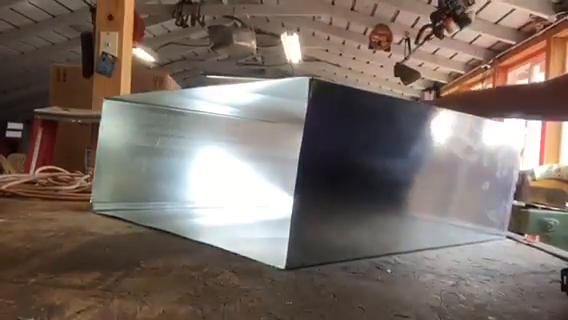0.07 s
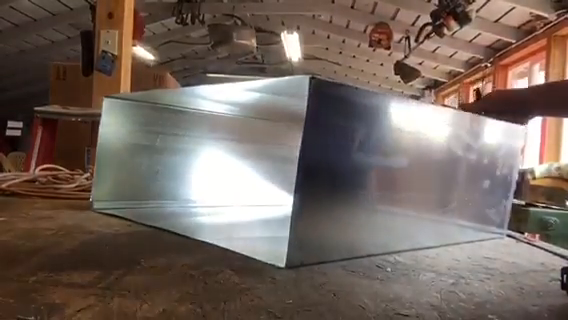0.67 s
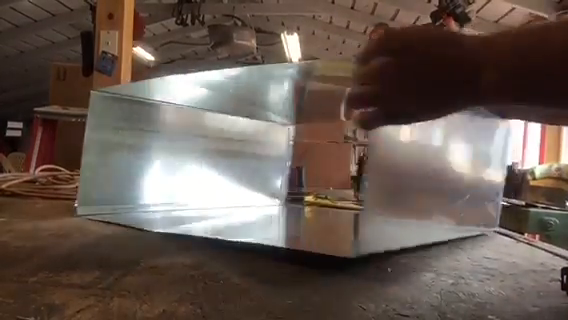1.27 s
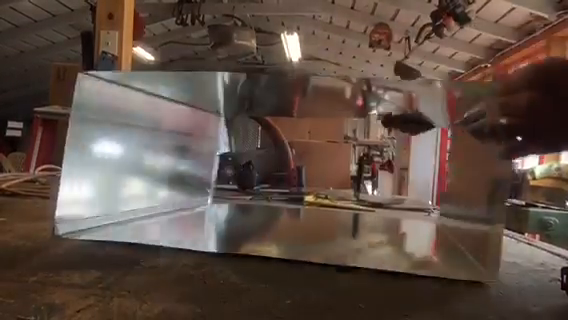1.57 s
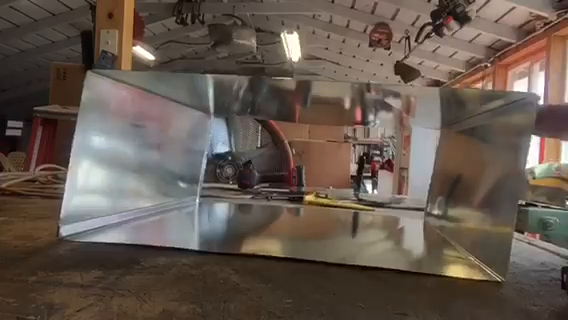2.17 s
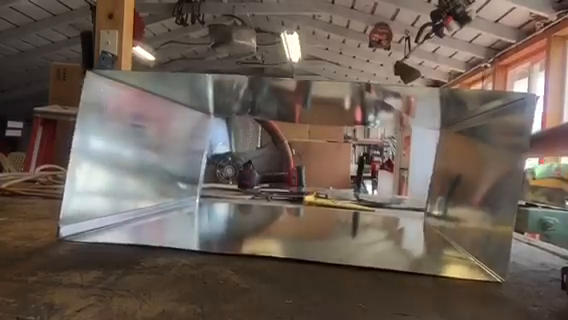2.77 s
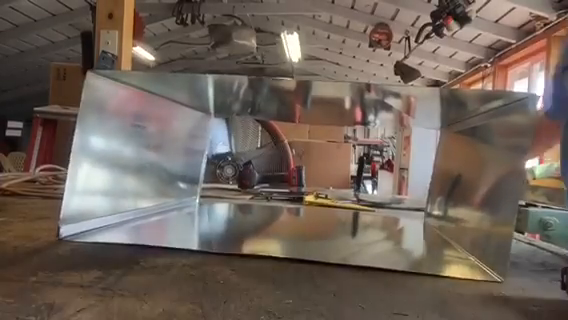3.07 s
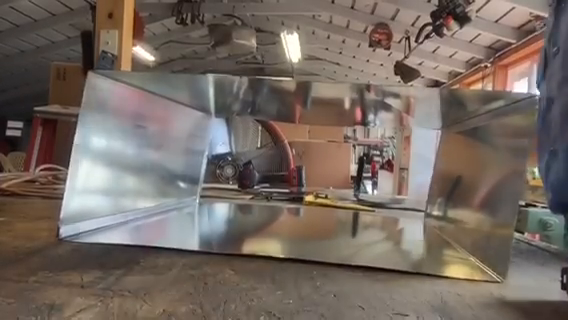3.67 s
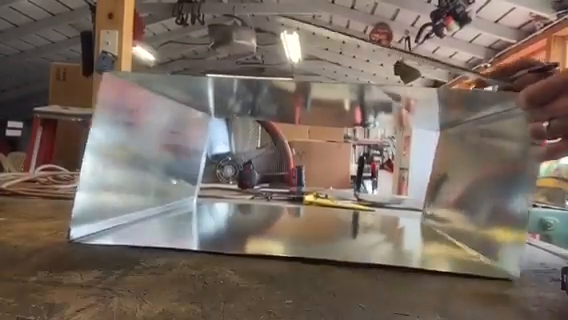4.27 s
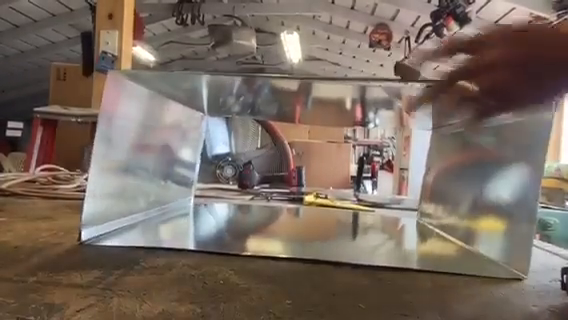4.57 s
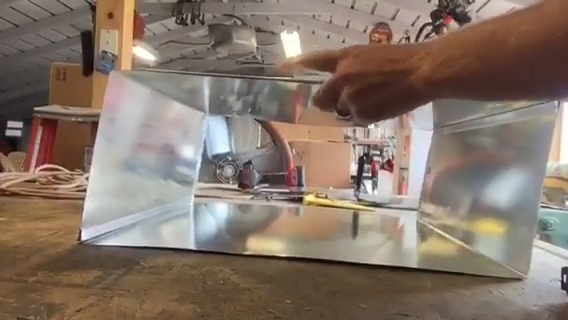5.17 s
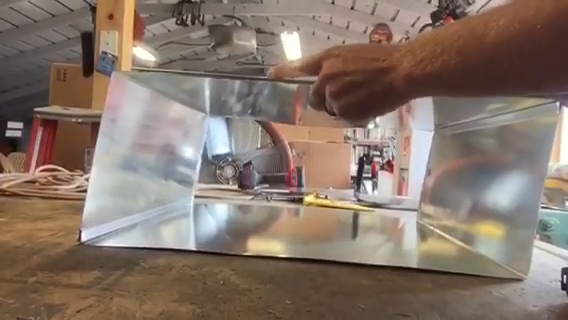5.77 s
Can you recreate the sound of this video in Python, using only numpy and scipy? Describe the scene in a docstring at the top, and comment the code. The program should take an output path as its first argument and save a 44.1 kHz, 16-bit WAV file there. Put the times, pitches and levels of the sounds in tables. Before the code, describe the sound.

A few dull knocks lead into a rough, snagging scrape as a hollow metal duct is turned on a concrete floor, ending in a boom. Quiet footsteps shuffle on grit. The duct slides again briefly, the stressed sheet pops sharply, and it falls flat with a loud clatter and a last light tap. Everything is heard up close, with a short workshop echo and a faint low rumble.

```python
"""A sheet-metal duct is handled on a gritty workshop floor, close to the microphone.
First come dull knocks and the soft hiss of skin on the sheet. From 1.1 s the duct is swung round:
its edge scrapes, judders and snags on the grit, and the thin walls boom. From 2.2 s shoes scuff
as the worker steps round it. At 4 s it is nudged again, at 4.6 s a stressed wall snaps through
sharply, and near 5 s the duct drops flat with a clatter."""
import sys
import numpy as np
from scipy import signal
from scipy.fft import rfft, irfft, next_fast_len
from scipy.io import wavfile
from scipy.ndimage import uniform_filter1d

SR = 44100
rng = np.random.default_rng(int(sys.argv[2]) if len(sys.argv) > 2 else 0)


def transcribe(signal):
    """Save signal, clipped to [-1, 1], as a 16-bit WAV file at the path in sys.argv[1]."""
    frames = np.atleast_2d(signal).T
    limited = np.clip(frames, -1, 1)
    pcm = np.round(limited * 32767).astype(np.int16)
    wavfile.write(sys.argv[1], SR, pcm)


N = 265658
TIME = np.arange(N) / SR
RING_TIME = TIME[:SR]  # one second


def amp(db):
    """Decibels to gain."""
    return 10 ** (np.asarray(db) / 20)


def unit_rms(x):
    """Scaled to rms 1."""
    return x / np.sqrt(np.mean(x ** 2) + 1e-20)


def unit_energy(x):
    """Scaled to energy 1."""
    return x / np.linalg.norm(x)


def lookup(points, hz):
    """Interpolates a table over log frequency."""
    point_hz, value = np.transpose(points)
    return np.interp(np.log(hz + 1), np.log(point_hz), value)


def add(mix, start_s, sound):
    """Lays a sound into the mix."""
    part = mix[max(round(start_s * SR), 0):][:len(sound)]
    part += sound[:len(part)]


def coloured(x, spectrum):
    """Filters x by a table of Hz and dB."""
    size = next_fast_len(len(x) + 4096)
    gain = amp(lookup(spectrum, np.fft.rfftfreq(size, 1 / SR)))
    return irfft(rfft(x, size) * gain, size)[:len(x)]


def band(x, low_hz, high_hz, order=2):
    """Causal high-pass and low-pass."""
    for hz, kind in (low_hz, "highpass"), (high_hz, "lowpass"):
        x = signal.sosfilt(signal.butter(order, min(hz, SR / 2 - 1), kind, fs=SR, output="sos"), x)
    return x


def envelope(start_s, attack_s, release_at_s, fade_db_per_s):
    """Linear attack, hold, steady fade."""
    attack = np.clip((TIME - start_s) / attack_s, 0, 1)
    return attack * amp(-fade_db_per_s * np.maximum(TIME - release_at_s, 0))


def drift(first_samples, second_samples):
    """Noise smoothed by two moving averages, rms 1."""
    smooth = uniform_filter1d(rng.standard_normal(N), first_samples)
    return unit_rms(uniform_filter1d(smooth, second_samples))


def grains(per_s, spread_db):
    """Random clicks, most small and a few large."""
    size = amp(spread_db * np.minimum(rng.exponential(1, N), 4))
    return unit_rms(size * rng.choice([-1, 1], N) * (rng.random(N) < per_s / SR))


def damped_mode(hz, t60_s):
    """One decaying sine, tapered to zero at 1 s."""
    t = RING_TIME
    return np.sin(2 * np.pi * hz * t) * np.exp(-np.log(1000) * t / t60_s) * (1 - t ** 2)


def noise_tail(t60_table):
    """A dense ring in which each frequency dies at its own rate."""
    hz, t, spectra = signal.stft(rng.standard_normal(SR), SR, nperseg=256)
    decay = amp(-60 * t / lookup(t60_table, hz)[:, None])
    return signal.istft(spectra * decay, SR, nperseg=256)[1][:SR]


# Workshop air. Each row: frequency in Hz, relative density in dB.
AIR_SPECTRUM = [(15, -40.5), (25, -8.5), (75, 1.5), (129, -6), (193, -16), (297, -11), (378, -23),
                (762, -26.5), (1020, -20.5), (1200, -25.5), (1570, -28), (1800, -31.5), (4500, -36),
                (5280, -37), (15500, -43.5)]


def background(air_db=-56, waver_db=0.5, hum_hz=120, hum_db=-68):
    """A wavering low rumble under smooth hiss, with faint mains hum."""
    air = amp(air_db) * unit_rms(coloured(rng.standard_normal(N), AIR_SPECTRUM))
    rumble = signal.sosfiltfilt(signal.butter(2, 250, fs=SR, output="sos"), air)
    waver = amp(waver_db * drift(3000, 1500)) - 1
    hum = amp(hum_db) * np.sin(2 * np.pi * hum_hz * TIME)
    return air + rumble * waver + hum


# Room decay. Each row: frequency in Hz, T60 in seconds.
ROOM_DECAY = [(100, 0.92), (1000, 0.39), (5000, 0.33), (14000, 0.44)]


def reverb(x, build_s=0.024):
    """The workshop's reflections build up and die away, the bass last."""
    response = noise_tail(ROOM_DECAY) * np.minimum(RING_TIME / build_s, 1)
    return signal.fftconvolve(x, unit_energy(response))[:N]


# Skin on metal. Each row: frequency in Hz, relative density in dB.
RUB_SPECTRUM = [(900, -23), (1300, 1), (1600, -2.5), (1900, -7.5), (2200, -4.5), (2800, -19), (6500, -22.5),
                (7600, -18.5), (9000, -22), (15000, -37)]


def rub(start_s=0.092, level_db=-58.5):
    """Skin hisses softly over the smooth sheet."""
    level = amp(level_db) * envelope(start_s, attack_s=0.016, release_at_s=start_s, fade_db_per_s=31.5)
    return level * unit_rms(coloured(rng.standard_normal(N), RUB_SPECTRUM))


# Sole on grit. Each row: frequency in Hz, relative density in dB.
SOLE_SPECTRUM = [(410, -63), (700, -17), (737, -33), (1100, -0.5), (1530, -4), (2030, -9.5), (3300, -3),
                 (3660, -8), (4790, -4), (6270, -23), (10500, -28), (11600, -25), (15000, -38)]
# Rasp resonances. Each row: centre in Hz, width in Hz, relative level in dB.
SOLE_RESONANCES = [(1400, 100, 9), (1810, 310, 1), (2450, 350, -4), (4220, 68, 0), (4690, 150, -2)]
# Shoe scuffs. Each row: midpoint in seconds, length in seconds, level in dB, tilt in dB per octave.
SHOE_SCUFFS = [(2.247, .06, -63, -4.5), (2.366, 0.085, -44, -0.5), (2.396, 0.079, -49, 0.5),
               (2.631, 0.077, -61.5, -5), (2.873, 0.085, -55, 1), (3.341, 0.083, -56.5, 4),
               (3.406, 0.085, -48.5, 1.5), (3.487, 0.17, -57.5, 3.5), (3.563, 0.086, -56.5, 7),
               (3.82, 0.35, -67, 4.5)]


def scuffs(rasp_db=-2):
    """Soles brush over fine grit with a slightly pitched rasp."""
    out = np.zeros(N)
    grit = grains(per_s=2900, spread_db=0.5)
    rasp = sum(amp(db) * unit_rms(signal.lfilter(*signal.iirpeak(hz, hz / width_hz, SR), grit))
               for hz, width_hz, db in SOLE_RESONANCES)
    rasp = amp(rasp_db) * unit_rms(band(rasp, 1240, 5200, order=4))
    brush = unit_rms(coloured(grit, SOLE_SPECTRUM)) + rasp
    for mid_s, length_s, db, tilt_db in SHOE_SCUFFS:
        piece = brush[int(mid_s * SR) - int(length_s * SR):int(mid_s * SR)]
        piece = unit_rms(coloured(piece, [(1200, -tilt_db), (4800, tilt_db)]))
        add(out, mid_s - length_s / 2, amp(db) * piece * signal.windows.hann(len(piece)))
    return out


def thud(hz, t60_s, puff_gain=0.32, puff_s=0.019, rise_s=0.00096):
    """A dull blow: one damped note in a puff of noise."""
    noise = unit_rms(band(rng.standard_normal(SR), hz * 0.42, hz * 1.27, order=3))
    puff = puff_gain * noise * np.exp(-RING_TIME / puff_s)
    return (damped_mode(hz, t60_s) + puff) * (1 - np.exp(-RING_TIME / rise_s))


# Dull knocks. Each row: start in seconds, level in dB, pitch in Hz, T60 in seconds.
KNOCKS = [(.001, -20.5, 592, 0.023), (.011, -29, 296, 0.058), (0.113, -35, 171, 0.057),
          (0.157, -37, 128, 0.21), (1.113, -35, 293.6, 0.27), (1.7, -19.5, 162, 0.094),
          (1.704, -17.5, 268, 0.075), (2.255, -45, 129, 0.22), (3.330, -43.5, 463, 0.072),
          (3.354, -47.5, 517, 0.091), (3.393, -38, 354, 0.12), (3.419, -32, 277, 0.078),
          (3.43, -39, 123, 0.22), (4.508, -29, 275, 0.17), (4.582, -28, 302.4, 0.29),
          (4.785, -30, 283, 0.12), (4.974, -21.5, 261.7, 0.32), (5.104, -25, 278, 0.25)]


def knocks():
    """Knocks, footfalls and hollow booms of the duct, one thud each."""
    out = np.zeros(N)
    for start_s, db, hz, t60_s in KNOCKS:
        add(out, start_s, amp(db) * thud(hz, t60_s))
    return out


# Slow wall modes. Each row: frequency in Hz, relative level in dB, T60 in seconds.
WALL_MODES = [(57.8, -2, 0.93), (70.3, -5, .8), (88, -7, 0.58), (110.2, 4, 0.28), (126.54, 1, 1),
              (141.6, -6.5, 0.6), (185, -6, 0.3)]
# Wall flexes. Each row: start in seconds, level in dB.
WALL_FLEXES = [(1.248, -43), (1.698, -35.5), (4.441, -37), (4.588, -34), (4.966, -34.5)]


def wobble(rise_s=0.0085):
    """The broad walls swing slowly when the duct is pushed or lands."""
    out = np.zeros(N)
    flex = sum(amp(db) * damped_mode(hz, t60_s) for hz, db, t60_s in WALL_MODES)
    flex *= 1 - np.exp(-RING_TIME / rise_s)
    for start_s, db in WALL_FLEXES:
        add(out, start_s, amp(db) * flex)
    return out


# Ring of the buckled patch. Each row: frequency in Hz, relative level in dB, T60 in seconds.
BUCKLE_MODES = [(2050, -2.5, 0.028), (2800, 0.5, 0.039), (3260, 2, 0.024), (3520, -5, 0.036),
                (4500, -5.5, 0.023), (1156, -16, 0.31), (1232, -14, 0.9), (1360, -26, 0.42),
                (2010, -24.5, 0.67), (3270, -26, 0.67), (4644, -19, 0.6), (4530, -18, 0.7),
                (4500, -20, 0.76)]


def buckle(start_s=4.5738, gain_db=-16.5, rise_s=0.00051):
    """The stressed wall snaps through: a bright click, then a thin ring."""
    out = np.zeros(N)
    ring = sum((-1) ** k * amp(db) * damped_mode(hz, t60_s)
               for k, (hz, db, t60_s) in enumerate(BUCKLE_MODES))
    add(out, start_s, amp(gain_db) * ring * (1 - np.exp(-RING_TIME / rise_s)))
    return out


# Strongest wall and air modes. Each row: frequency in Hz, relative level in dB.
DUCT_MODES = [(124, -11), (160, -25), (232, -8.5), (256, 0.5), (272, -12.5), (286, -5), (305, 4),
              (324, -3.5), (416, -11), (513, -4.5), (556, -3.5), (678, -10), (811, -9), (856, -8.5),
              (1000, -12), (1043, -6.5), (1156, -8), (1232, -13.5), (1268, -8), (1404, -7.5), (1468, -10),
              (1635, -12.5), (1835, -6.5), (4501, -18), (4644, -15)]
# Crowd of weaker sheet modes. Each row: frequency in Hz, relative density in dB.
SHEET_SPECTRUM = [(50, 1), (110, 5.5), (200, -3), (300, 9), (600, -5.5), (850, -1.5), (1300, -2),
                  (2200, -6.5), (3300, -8.5), (4700, -5), (6000, -14), (9000, -14.5), (12500, -16),
                  (15500, -22.5)]
# Sheet decay. Each row: frequency in Hz, T60 in seconds.
SHEET_DECAY = [(100, 1.1), (300, 1.33), (700, 0.91), (1400, 0.73), (2500, 0.65), (4600, 0.63), (7000, 0.51),
               (13000, 0.35)]


def duct_rings(count, strong_db=-3):
    """Impulse responses at several spots: the same strong modes in new phases, among weak ones."""
    t = RING_TIME
    modes = np.array([amp(db) * np.exp((2j * np.pi * hz - np.log(1000) / lookup(SHEET_DECAY, hz)) * t)
                      for hz, db in DUCT_MODES])
    end_fade = np.minimum((1 - t) * 10, 1)
    rings = []
    for _ in range(count):
        phasors = np.exp(2j * np.pi * rng.random(len(modes)))
        strong = amp(strong_db) * unit_energy((phasors @ modes).real)
        weak = unit_energy(coloured(noise_tail(SHEET_DECAY), SHEET_SPECTRUM))
        rings.append(unit_energy(strong + weak) * end_fade)
    return rings


def clank(ring, hz, octaves, chatter_s, crack_gain, crack_s=0.018):
    """Chattering contacts excite a dry crack and the modes within `octaves` either side of hz."""
    chatter = rfft(rng.standard_normal(SR) * np.exp(-RING_TIME / chatter_s))
    contacts = irfft(chatter / np.sqrt(abs(chatter) + 1e-9))[:SR // 8]  # many contacts even the colour
    crack = coloured(rng.standard_normal(SR), SHEET_SPECTRUM) * np.exp(-RING_TIME / crack_s)
    metal = signal.fftconvolve(contacts, ring + crack_gain * unit_energy(crack))
    return unit_energy(band(metal, hz / 2 ** octaves, hz * 2 ** octaves))


# Free blows. Each row: start in seconds, energy in dB, centre in Hz, chatter decay in seconds.
DUCT_BLOWS = [(1.109, -17, 900, 0.0027), (1.699, 1.5, 540, 0.0025), (4.032, -22, 3330, 0.007),
              (4.223, -10, 5100, 0.0017), (4.5737, 8.5, 4940, 0.00075), (4.631, 1, 1330, 0.0055),
              (4.905, 1.5, 2360, 0.0035), (4.939, 7.5, 4660, 0.036), (4.9407, 7, 1340, 0.0079),
              (4.96, 10, 870, 0.0042), (4.958, 6.5, 284, 0.014), (5.101, -10.5, 510, 0.045),
              (5.373, -17, 2780, 0.0084)]


def blows():
    """Taps and landings ring the sheet; harder contact wakes a higher, wider band of modes."""
    out = np.zeros(N)
    for (start_s, db, hz, chatter_s), ring in zip(DUCT_BLOWS, duct_rings(len(DUCT_BLOWS))):
        hardness = np.log2(hz / 1000)
        octaves = 0.89 + 0.25 * hardness
        crack_gain = 0.067 + 83 * chatter_s  # longer chatter damps the sheet: more dry crack
        add(out, start_s, amp(db) * clank(ring, hz, octaves, chatter_s, crack_gain))
    return out


# Snags in the swing. Each row: start in seconds, clank energy in dB, centre in Hz, boom level in dB.
EDGE_SNAGS = [(1.29, -1.5, 1330, -18), (1.345, 2.5, 1220, -21), (1.416, 6, 1220, -46),
              (1.46, 9.5, 940, -30), (1.48, 2, 2000, -16), (1.508, -2, 1010, -11.5)]


def snags():
    """The edge snags and jumps: the wall booms, and the sheet, pressed to the floor, clanks dryly."""
    out = np.zeros(N)
    for (start_s, clank_db, hz, boom_db), ring in zip(EDGE_SNAGS, duct_rings(len(EDGE_SNAGS))):
        add(out, start_s, amp(clank_db) * clank(ring, hz, octaves=0.57, chatter_s=0.0037, crack_gain=1.7))
        add(out, start_s, amp(boom_db) * thud(hz=308, t60_s=0.07))
    return out


# The long swing. Each row: time in seconds, effort in dB.
SWING_EFFORT = [(1.177, -41), (1.259, -25), (1.335, -21.5), (1.42, -25), (1.5, -27.5), (1.56, -29),
                (1.69, -32.5), (1.799, -47)]
# Short slides. Each row: start in seconds, length in seconds, peak effort in dB, brightness in dB.
SHORT_SLIDES = [(1.105, 0.065, -43.5, -1.5), (1.864, 0.077, -47, 1.5), (4.037, 0.14, -49, -3),
                (4.225, 0.29, -37.5, -1.5), (4.743, 0.35, -47.5, 5), (5.262, 0.18, -46, -1)]


def scrape_gain(level_db, effort_slope, brightness_slope, fade_db_per_s):
    """One band's gain follows the effort of swing and slides, then rings out. Slopes in dB per dB."""
    def follow(effort_db, reference_db=-26):
        return amp(level_db + effort_slope * (effort_db - reference_db))

    times_s, efforts_db = np.transpose(SWING_EFFORT)
    swing = follow(np.interp(TIME, times_s, efforts_db))
    gains = [swing * envelope(times_s[0], 0.016, times_s[-1], fade_db_per_s)]
    damped_db_per_s = 2 * fade_db_per_s  # the hand stays on the duct after a slide
    for start_s, length_s, peak_db, brightness_db in SHORT_SLIDES:
        speed = np.sin(np.pi * np.clip((TIME - start_s) / length_s, 0, 1))
        slide = follow(peak_db + 6.5 * (speed - 1)) * amp(brightness_slope * brightness_db)
        gains.append(slide * envelope(start_s, 0.13 * length_s, start_s + length_s, damped_db_per_s))
    return np.linalg.norm(gains, axis=0)


# Direct sound of the edge on grit. Each row: frequency in Hz, relative density in dB.
CATCH_SPECTRUM = [(24, -45.5), (40, -14), (117, -22), (224, 1.5), (317, 7), (461, -31), (637, -28),
                  (838, 4.5), (926, -8.5), (1250, -0.5), (2160, -14.5), (4350, -13), (6160, -32),
                  (12400, -37.5), (15500, -50.5)]


def scrape(floor_damping_s=0.15, direct_gain=0.66, judder_db=3.0, spots_per_s=4):
    """The edge catches on grit in uneven slips; each catch rings the sheet, which the floor damps."""
    judder = amp(judder_db * drift(500, 300))
    catches = grains(per_s=3500, spread_db=3.0) * judder
    rings, ringing = duct_rings(5), np.zeros(N)
    damping = np.exp(-RING_TIME / floor_damping_s)
    for k, ring in enumerate(rings):  # the contact point wanders along the edge
        share = np.maximum(np.cos(2 * np.pi * (spots_per_s * TIME - k) / len(rings)), 0)
        ringing += signal.oaconvolve(catches * share, ring * damping)[:N]
    metal = unit_rms(ringing) + direct_gain * unit_rms(coloured(catches, CATCH_SPECTRUM))

    def voice(low_hz, high_hz, **response):
        return scrape_gain(**response) * unit_rms(band(metal, low_hz, high_hz, order=4))

    boom = voice(54, 450, level_db=-32.5, effort_slope=0.93, brightness_slope=0.1, fade_db_per_s=33)
    rasp = voice(520, 2900, level_db=-27.5, effort_slope=1.0, brightness_slope=0, fade_db_per_s=67)
    zing = voice(3260, 5300, level_db=-32.5, effort_slope=0.94, brightness_slope=0.7, fade_db_per_s=133)
    grit = voice(5950, 13300, level_db=-39, effort_slope=0.97, brightness_slope=1.05, fade_db_per_s=180)
    return boom + rasp + zing + grit


def scene(duct_send_db=-12, shoe_send_db=-14, knock_send_db=-10):
    """Duct, shoes, knocks and background in one room, mono."""
    duct = scrape() + snags() + blows() + buckle() + wobble() + rub()
    shoes, thuds = scuffs(), knocks()
    room = reverb(amp(duct_send_db) * duct + amp(shoe_send_db) * shoes + amp(knock_send_db) * thuds)
    return (duct + shoes + thuds + room + background())[None]


def record(dry, low_cut_hz=42, high_cut_hz=15400):
    """The microphone's bass roll-off and the recorder's band limit."""
    thinned = signal.sosfilt(signal.butter(3, low_cut_hz, "highpass", fs=SR, output="sos"), dry)
    lowpass = signal.firwin(511, high_cut_hz, window=("kaiser", 9), fs=SR)
    return signal.oaconvolve(thinned, lowpass[None], "same")


dry = scene()
out = record(dry)
transcribe(out)
```